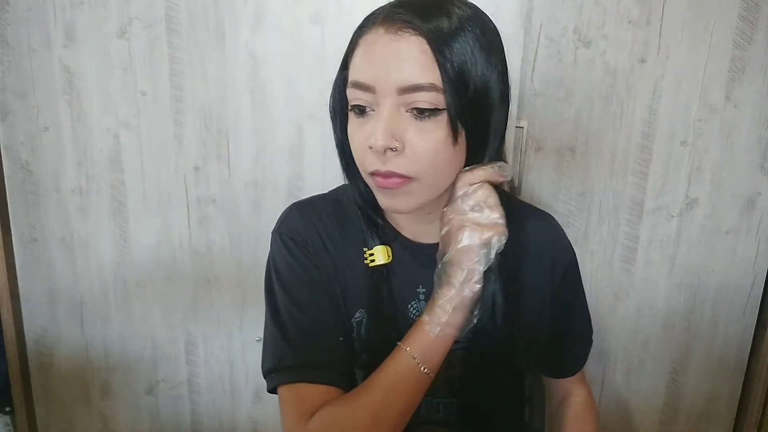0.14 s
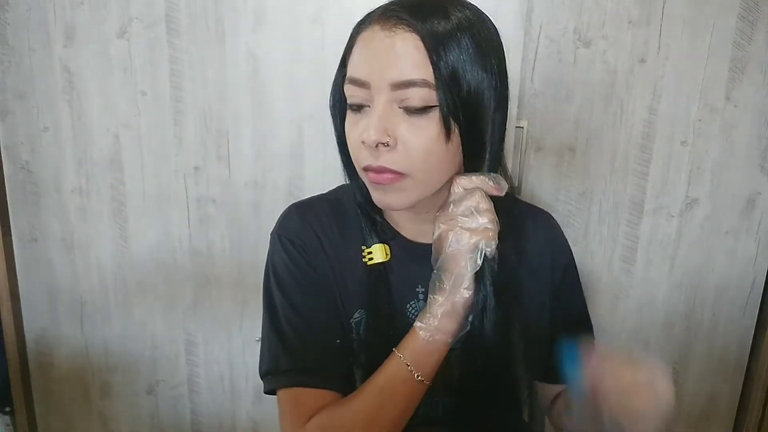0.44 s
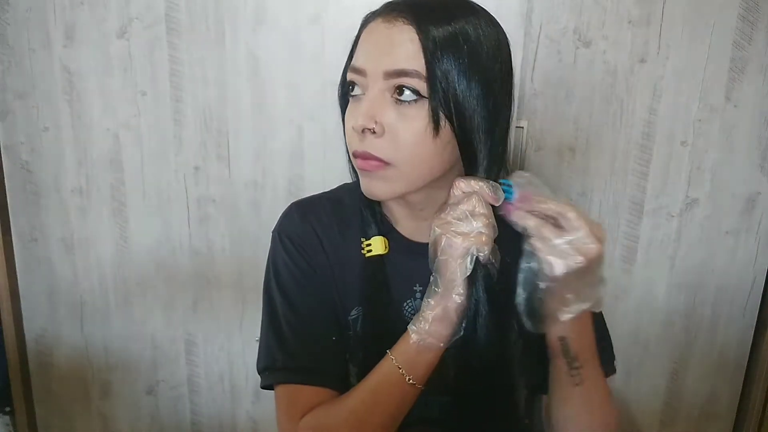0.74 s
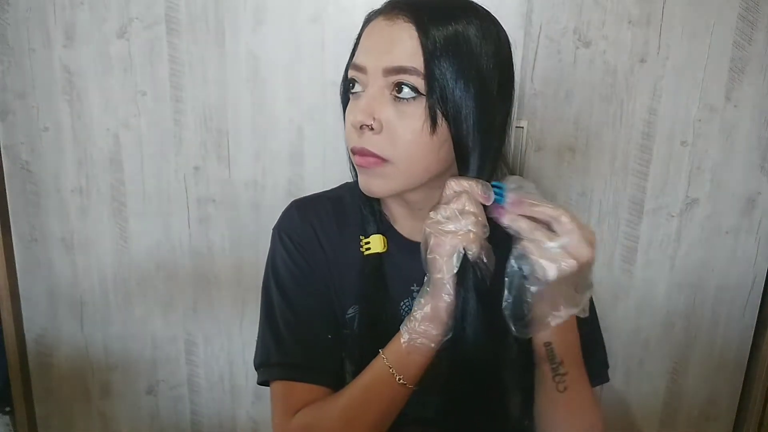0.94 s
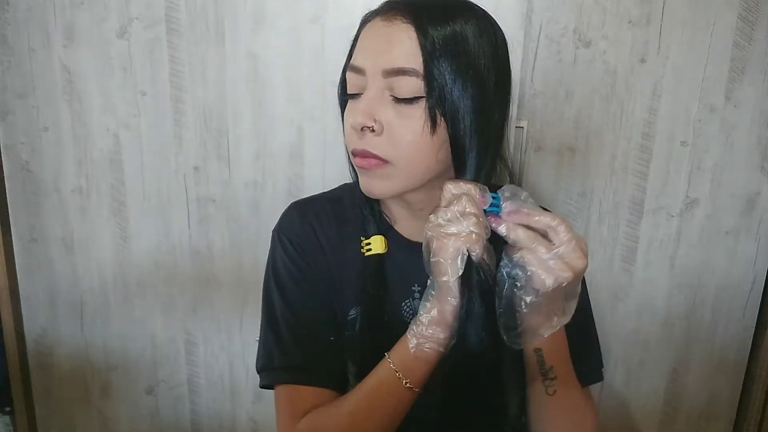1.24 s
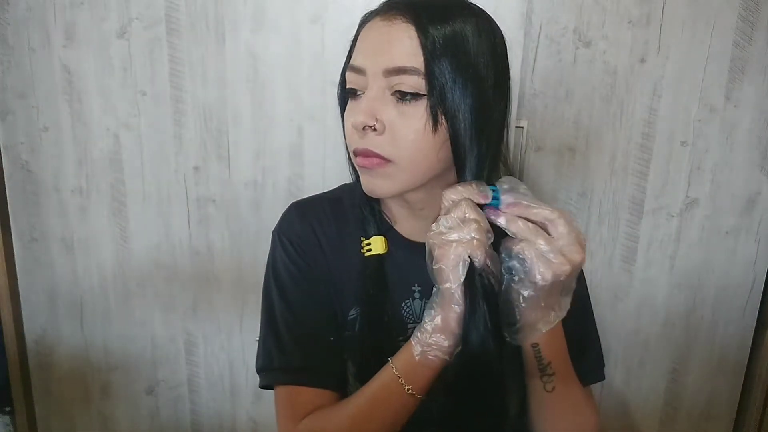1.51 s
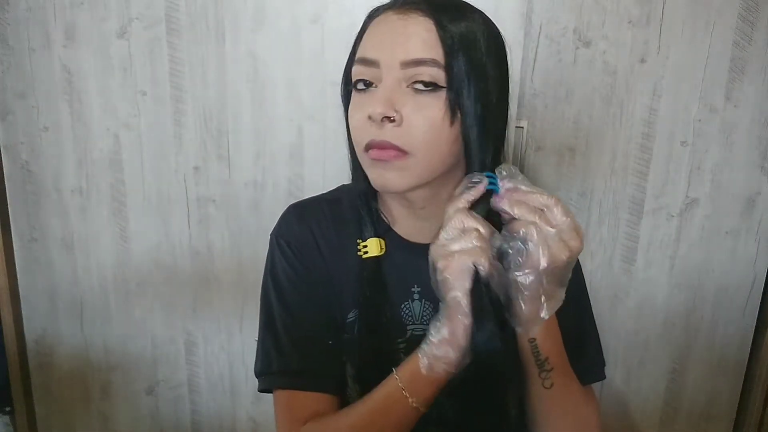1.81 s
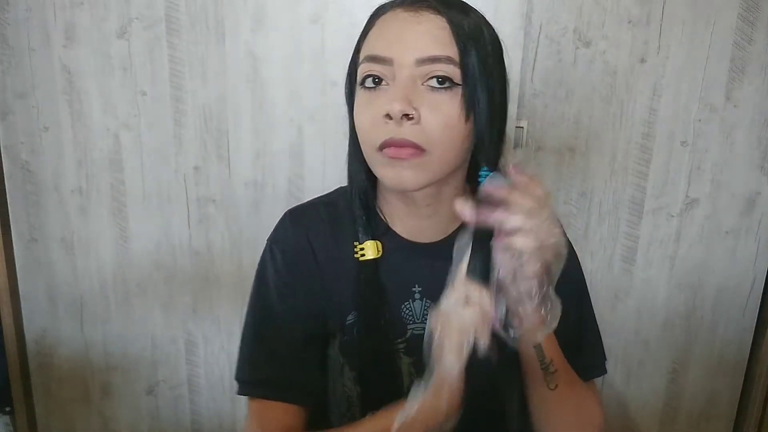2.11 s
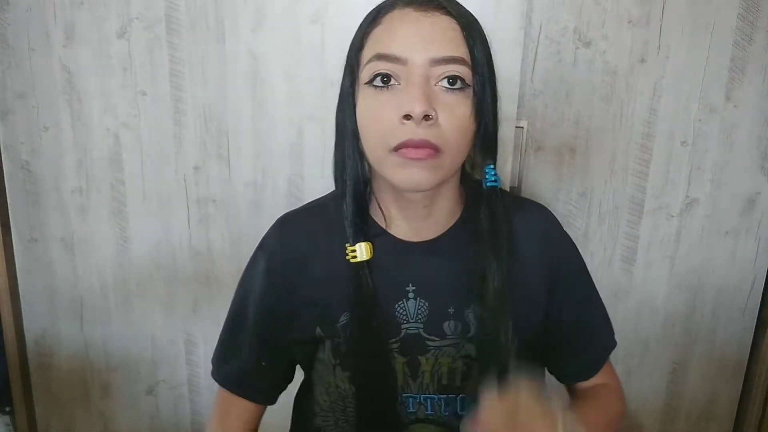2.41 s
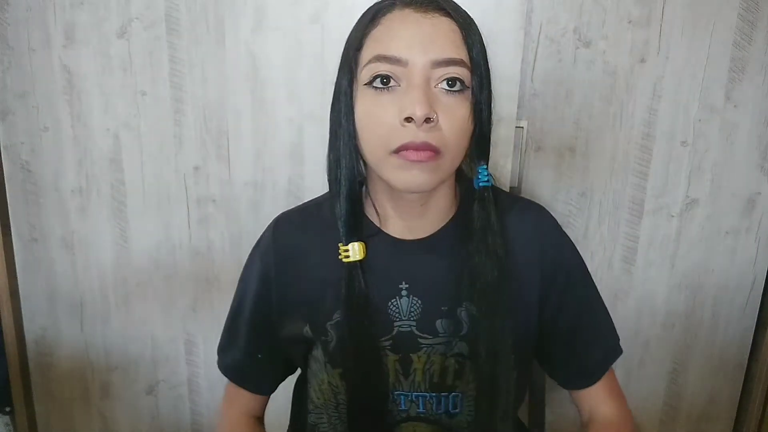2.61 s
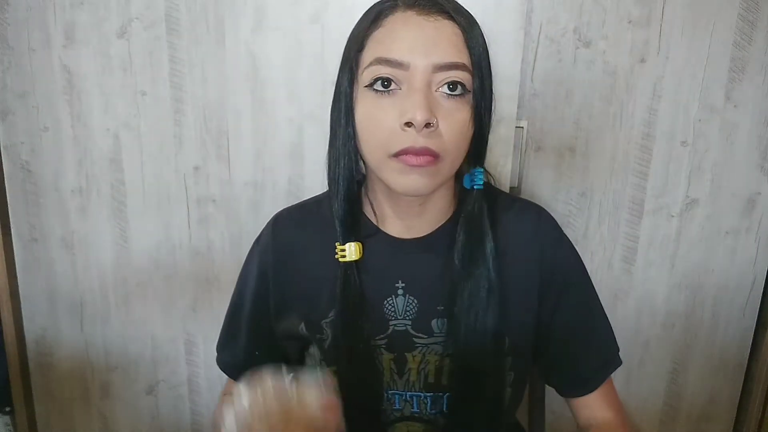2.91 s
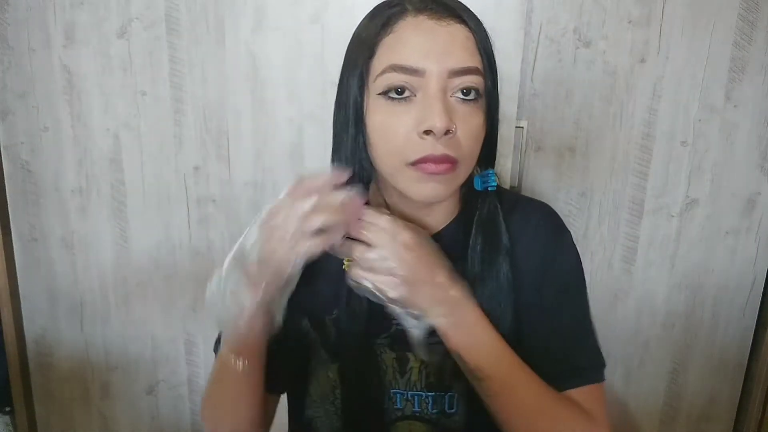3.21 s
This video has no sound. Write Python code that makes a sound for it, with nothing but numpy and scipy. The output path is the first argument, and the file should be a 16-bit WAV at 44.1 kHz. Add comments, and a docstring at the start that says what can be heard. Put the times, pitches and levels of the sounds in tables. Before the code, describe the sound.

Thin plastic gloves crinkle and rustle softly as hands handle hair in a small room.

```python
"""Plastic gloves in long hair

A small room, a nearly mono microphone pair close to hands in thin plastic gloves, handling hair.
The film buckles in thousands of tiny snaps as the fingers work; larger folds add a lower rustle,
and quick grips give short crunches. Behind the hands: room rumble, a low hum and a thin steady whine."""
import sys
import numpy as np
from scipy import signal
from scipy.fft import rfft, irfft, next_fast_len
from scipy.io import wavfile
from scipy.ndimage import map_coordinates

SR = 44100
rng = np.random.default_rng(int(sys.argv[2]) if len(sys.argv) > 2 else 0)


def wrap_up_sound(samples):
    """Save the sound to the file named by the first command line argument, as 16-bit audio."""
    columns = np.atleast_2d(samples).T
    # keep every value between -1 and 1, then stretch to whole-number steps
    tamed = np.clip(columns, -1, 1)
    steps = np.round(tamed * 32767).astype(np.int16)
    wavfile.write(sys.argv[1], SR, steps)


N = 147735


def creases():
    """The fingers work the film into fine crinkles and mid-sized creases, right at the microphone."""
    # how hard the fingers work: t/s, fine crinkle level/dB, mid-sized crease level/dB (both relative)
    effort = [(0.0, -45, -48.5), (0.08, -45.5, -49.5), (0.13, -44, -44.5), (0.27, -42, -46),
              (0.34, -46, -52), (0.36, -47, -46.5), (0.40, -44, -48.5), (0.54, -47.5, -52),
              (0.58, -44, -46.5), (0.66, -44, -46), (0.69, -48.5, -50.5), (0.79, -46.5, -50.5),
              (0.85, -50.5, -56), (1.109, -50.5, -62), (1.15, -41, -47), (1.175, -49, -50),
              (1.22, -46.5, -51.5), (1.41, -50.5, -53.5), (1.48, -48, -48.5), (1.54, -45.5, -49.5),
              (1.6, -45.5, -46.5), (1.69, -44, -48), (1.77, -40, -44), (1.86, -39.5, -46.5),
              (1.88, -36, -39.5), (2.02, -40, -43), (2.071, -37, -38.5), (2.17, -36, -42),
              (2.26, -37.5, -40), (2.391, -39.5, -42.5), (2.617, -40, -43), (2.64, -41, -37.5),
              (2.659, -37.5, -39.5), (2.73, -44, -44), (2.77, -44.5, -46.5), (2.81, -47.5, -46.5),
              (2.95, -43.5, -47), (2.999, -46.5, -48.5), (3.149, -38, -42), (3.23, -40.5, -44.5),
              (3.31, -48, -49.5), (3.35, -40, -43.5)]
    # spectrum of the fine crinkles: f/Hz, relative level/dB
    fine_colour = [(1000, -53), (4000, -26.5), (5900, -8.5), (6650, -5), (7400, -5.5), (9150, 2),
                   (10200, -4), (11900, 0.5), (15800, -4.5)]
    # spectrum of the mid-sized creases: f/Hz, relative level/dB
    crease_colour = [(1400, -32), (2700, -14), (3300, -4.5), (3900, 1.5), (4900, 3), (5700, 0.6),
                     (8200, -0.5), (15000, -17)]
    times, fine_db, crease_db = np.transpose(effort)
    fine = crinkle(curve(np.c_[times, fine_db]), fine_colour)
    mid_sized = crinkle(curve(np.c_[times, crease_db]), crease_colour)
    return amp(0.03) * fine + amp(-1.35) * mid_sized


def crinkle(level_db, colour, crowding=0.7):
    """Creases buckle in clumps over the smooth hiss of film sliding on hair."""
    busy = amp(crowding * (level_db - level_db.mean()))  # more effort brings more snaps
    per_s = 7000 * busy * amp(2 * wobble(130))
    buckles = crackle(per_s, low_hz=1510, high_hz=17840, cycles=1.0, scatter_db=3.0)
    buckles = unit(buckles / np.sqrt(busy))  # so crowding sets density, not loudness
    sliding = amp(0.2) * rng.standard_normal(N)
    film = coloured(buckles + sliding, lambda hz: along(colour, hz))
    return amp(level_db + 0.2 * wobble(30.03)) * unit(film)


def crackle(per_s, low_hz, high_hz, cycles, scatter_db, size=96):
    """Tiny buckles at random times, each a damped ring of its own pitch and strength; rms 1."""
    chance, pitch, phase = rng.random((3, N))
    strength = amp(scatter_db * np.clip(rng.standard_normal(N), -2, 2))
    onsets = np.flatnonzero(chance < per_s / SR)
    hz = (low_hz + (high_hz - low_hz) * pitch[onsets])[:, None]
    turns = hz * np.arange(size) / SR
    envelopes = strength[onsets, None] * np.sqrt(hz) * np.exp(-turns / cycles)
    rings = envelopes * np.sin(2 * np.pi * (turns + phase[onsets, None]))
    samples = onsets[:, None] + np.arange(size)
    return unit(np.bincount(samples.ravel(), rings.ravel(), N + size)[:N])


def folds():
    """The loose cuffs and palms fold with a lower rustle."""
    # course of the rustle: t/s, relative level/dB
    folding = [(0.0, -72.5), (0.09, -69), (0.16, -60.5), (0.33, -60.5), (0.54, -64.5), (0.61, -58.5),
               (0.8, -64), (0.86, -71), (1.11, -73), (1.15, -54.5), (1.18, -63.5), (1.29, -64),
               (1.42, -67.5), (1.61, -58.5), (1.7, -65), (1.79, -51.5), (1.85, -56), (1.88, -47),
               (1.95, -50), (2.01, -56.5), (2.09, -47.5), (2.26, -47.5), (2.58, -58.5), (2.66, -49.5),
               (2.82, -63.5), (3.03, -67.5), (3.17, -50), (3.31, -58), (3.35, -61)]
    # spectrum of large folds: f/Hz, relative level/dB
    colour = [(150, -24), (1200, -14.5), (1550, -7.5), (1880, -0.5), (2500, -2.5), (3300, 2.5),
              (6000, -7.5), (15000, -21)]
    per_s = 3000 * amp(2.5 * wobble(60))
    buckles = crackle(per_s, low_hz=600, high_hz=7830, cycles=0.63, scatter_db=2.5)
    return amp(curve(folding) + 1.66) * unit(coloured(buckles, lambda hz: along(colour, hz)))


def grips(attack_s=0.0052):
    """Each quick grip sets off a dense run of buckles: attack, hold, release."""
    # grips: t/s, level/dB, hold/s, fall time constant/s, centre f/Hz
    crunches = [(0.113, -45, 0.035, 0.011, 6700), (0.22, -45.5, 0.05, .008, 7500),
                (0.351, -41, 0.018, .01, 8950), (0.604, -49, 0.054, 0.011, 8500),
                (1.126, -40, .023, .005, 7900), (1.283, -45, 0.0044, 0.0048, 8000),
                (1.343, -46.5, 0.006, 0.008, 9000), (1.475, -44.5, .006, 0.0091, 11000),
                (1.76, -44, 0.018, .012, 8000), (1.875, -37, 0.018, 0.01, 8500),
                (2.048, -41, 0.019, 0.016, 8500), (2.2, -41, 0.027, 0.018, 4800),
                (2.33, -41, 0.049, 0.041, 11000), (2.629, -32, 0.011, 0.012, 6530),
                (2.688, -42, .044, 0.006, 6800), (3.135, -40, 0.0072, .009, 8000)]
    t, out = np.arange(N) / SR, np.zeros(N)
    buckles = crackle(per_s=10000, low_hz=1200, high_hz=17300, cycles=1.3, scatter_db=2.0)
    for start, db, hold, fall, hz in crunches:
        attack = np.clip((t - start) / attack_s, 0, 1)
        release = np.exp(-np.maximum(t - start - attack_s - hold, 0) / fall)
        out += amp(db) * attack * release * unit(coloured(buckles, film_around(hz, octaves=0.67)))
    return out


def snaps(decay_s=0.00094, size=1024):
    """Single sharp ticks, each a crease flipping over."""
    # creases that snap through: t/s, relative level/dB, centre f/Hz
    flips = [(0.1229, -30, 7900), (0.261, -31, 9000), (.459, -40, 6000), (.463, -32, 6040),
             (.981, -39.5, 9000), (1.073, -36.5, 9000), (1.359, -34, 9000), (1.463, -38, 9000),
             (1.881, -29.5, 5000), (2.64, -28, 6500), (2.701, -31, 7000), (2.877, -35, 7500)]
    t, out = np.arange(size) / SR, np.zeros(N + size)
    for start, db, hz in flips:
        tick = rng.standard_normal(size) * np.exp(-t / decay_s)
        out[round(start * SR):][:size] += amp(db) * coloured(tick, film_around(hz, octaves=0.16))
    return out[:N]


def film_around(centre_hz, octaves):
    """The film's colour in dB against frequency, weighted toward one crease size."""
    # spectrum of the film as a whole: f/Hz, relative level/dB
    colour = [(1000, -24.5), (2400, -14), (4600, -1.5), (7600, -1.5), (9250, 4), (10200, -6.5),
              (11900, 2.5), (15800, 0.5)]
    return lambda hz: along(colour, hz) - 10 * np.log10(1 + (np.log2((hz + 1) / centre_hz) / octaves)**2)


def taut_film(start_s=1.133, length_s=0.026, ring_hz=2860, width_hz=100, level_db=-50.5):
    """One narrow resonance of the stretched film sounds while the pull lasts."""
    pull = arch(start_s, length_s)
    ring = coloured(rng.standard_normal(N), lambda hz: -20 * np.log10(1 + ((hz - ring_hz) / width_hz)**2))
    return amp(level_db) * pull * unit(ring)


def bumps(length_s=0.078):
    """Soft low bumps under the rustle, a few cycles each."""
    # bumps: t/s, level/dB, f/Hz
    thuds = [(1.1, -58, 101), (3.21, -55.5, 80)]
    t, out = np.arange(N) / SR, np.zeros(N)
    for start, db, hz in thuds:
        out += amp(db) * np.sqrt(2) * arch(start, length_s) * np.sin(2 * np.pi * hz * (t - start))
    return out


def room(x, size=3072):
    """The small room's short diffuse tail, which keeps changing because the hands move."""
    # reverberation time: f/Hz, time to fall by 60 dB/s
    t60 = [(200, 0.12), (2000, 0.26), (8000, 0.21), (16000, 0.18)]
    out, window = np.zeros(N + SR), signal.get_window("hann", size)
    padded = np.pad(x, (size // 2, size))
    for start in range(0, N + size // 2, size // 2):  # a fresh tail for each overlapping block
        hz, t, noise = signal.stft(rng.standard_normal(SR // 4), SR, nperseg=256)
        decay = amp(-60 * t / along(t60, hz)[:, None])
        tail = signal.istft(noise * decay, SR, nperseg=256)[1]
        wet = signal.fftconvolve(padded[start:start + size] * window, tail / np.linalg.norm(tail))
        out[start:start + len(wet)] += wet
    return out[size // 2:][:N]


def background(noise_db=-61.5, rumble_rise_db_per_s=1):
    """Room tone: slowly rising rumble, hiss, a steady hum and whine, and faint far-off tones."""
    # spectrum of rumble and hiss: f/Hz, relative level/dB
    colour = [(20, -15), (45, -12.5), (110, 1), (150, -6), (210, -15.5), (800, -17.5), (1300, -23),
              (3000, -28)]
    # swell of the hiss above the rumble: t/s, gain/dB
    swell = [(.22, 1), (.32, -2.5), (1.55, -1.5), (1.85, 0)]
    # partials of the hum, and the whine: f/Hz, level/dB
    hum = [(80.5, -72.5), (161, -80), (241, -80), (320, -83.5), (400, -84.5), (474.5, -86.5), (15661, -57)]
    # brief, unsteady far-off tones: t/s, length/s, f/Hz, level/dB
    far_tones = [(0.025, .15, 848, -71.5), (1.15, .22, 1122, -75)]
    t = np.arange(N) / SR
    noise = amp(noise_db) * unit(coloured(rng.standard_normal(N), lambda hz: along(colour, hz)))
    rumble = filtered(noise, lambda hz: hz < 170)
    out = (noise - rumble) * amp(curve(swell))
    out += rumble * amp(rumble_rise_db_per_s * (t - t.mean()))
    for hz, db in hum:
        out += tone(hz, db)
    for start, length, hz, db in far_tones:
        out += tone(hz, db) * amp(wobble(68.6)) * arch(start, length)
    return out


def tone(hz, db):
    """A sine at an rms level, its phase wandering slightly."""
    t = np.arange(N) / SR
    return np.sqrt(2) * amp(db) * np.sin(2 * np.pi * (hz * t + rng.random()) + 0.48 * wobble(15))


def amp(db):
    return 10 ** (np.asarray(db) / 20)


def unit(x):
    return x / np.sqrt(np.mean(x ** 2) + 1e-20)


def along(points, hz):
    """Interpolate (f/Hz, value) points on a log frequency axis."""
    knots_hz, values = np.transpose(points)
    return np.interp(np.log(hz + 1), np.log(knots_hz + 1), values)


def curve(rows):
    """One value per sample from (t/s, value) rows."""
    return np.interp(np.arange(N) / SR, *np.transpose(rows))


def arch(start_s, length_s):
    """A half-sine envelope, silent before and after."""
    return np.sin(np.pi * np.clip((np.arange(N) / SR - start_s) / length_s, 0, 1))


def wobble(rate):
    """A smooth random curve, rate knots a second."""
    return map_coordinates(rng.standard_normal(int(N * rate / SR) + 4), [np.arange(N) * rate / SR])


def coloured(x, gain_db, size=4096):
    """x through a causal filter of unit energy; gain_db is a function of frequency."""
    gain = np.maximum(amp(gain_db(np.fft.rfftfreq(size, 1 / SR))), 1e-6)
    cepstrum = irfft(np.log(gain))
    cepstrum[1:size // 2] *= 2  # fold onto positive time for minimum phase
    cepstrum[size // 2 + 1:] = 0
    response = irfft(np.exp(rfft(cepstrum)))
    return signal.fftconvolve(x, response / np.linalg.norm(response))[:len(x)]


def filtered(x, gain):
    """x times a gain that is a function of frequency."""
    size = next_fast_len(N + SR // 2)
    return irfft(rfft(x, size) * gain(np.fft.rfftfreq(size, 1 / SR)), size)[..., :N]


def scene(room_db=-5):
    """Gloves close up and centred, the room behind them almost alike in both microphones."""
    # room sound in the side channel: f/Hz, gain/dB
    width = [(100, -42), (500, -28), (1200, -32), (1850, -5), (2250, -6), (2500, -35), (4700, -66),
             (5600, -46.5), (7000, -55), (8500, -18.5), (9900, -1.5), (11400, -37), (12100, -46)]
    gloves = creases() + folds() + grips() + taut_film() + snaps()
    mid = gloves + bumps() + amp(room_db) * room(gloves) + background()
    diffuse = amp(room_db) * room(gloves) + background()
    side = filtered(diffuse, lambda hz: amp(along(width, hz)))
    return np.array([mid + side, mid - side])


def record(dry, top_hz=15750):
    """Two slightly unequal microphones; nothing passes above the band limit."""
    # left microphone relative to the right: f/Hz, level/dB
    lean = [(1500, 0), (1850, 5.7), (2400, 0), (9000, 0), (9900, -4.2), (10500, 0)]
    share = np.array([[0.5], [-0.5]])
    return filtered(dry, lambda hz: amp(along(lean, hz) * share) * (hz < top_hz))


dry = scene()
out = record(dry)
wrap_up_sound(out)
```